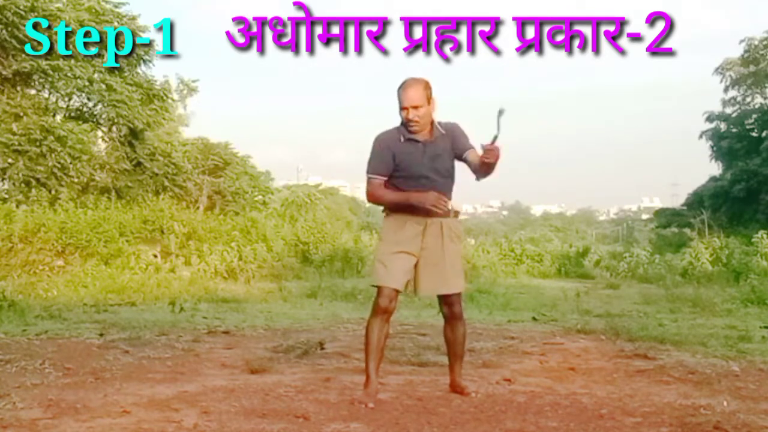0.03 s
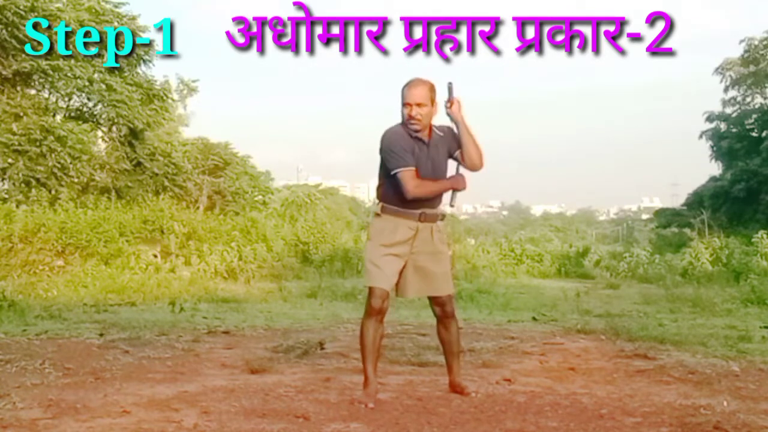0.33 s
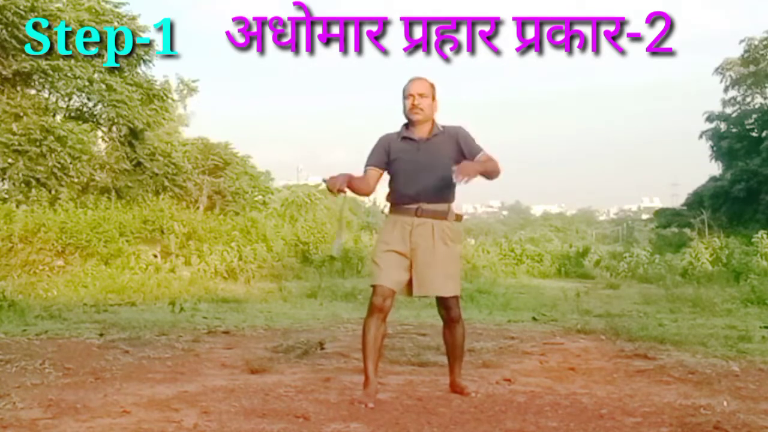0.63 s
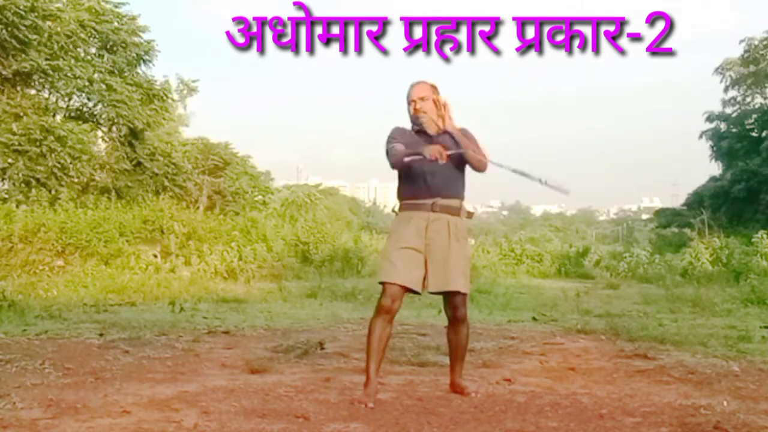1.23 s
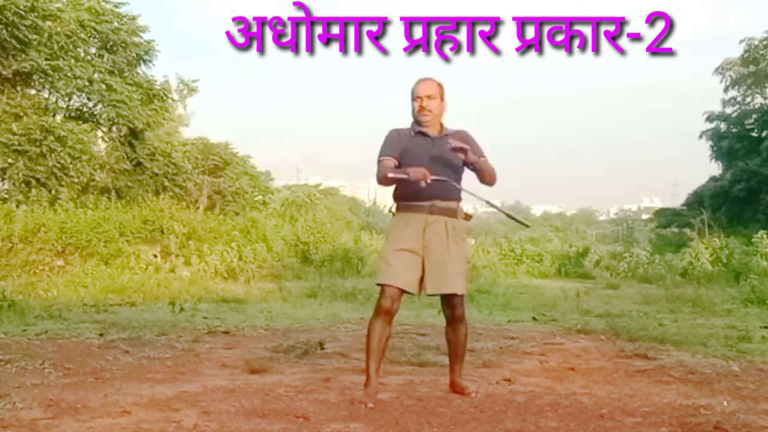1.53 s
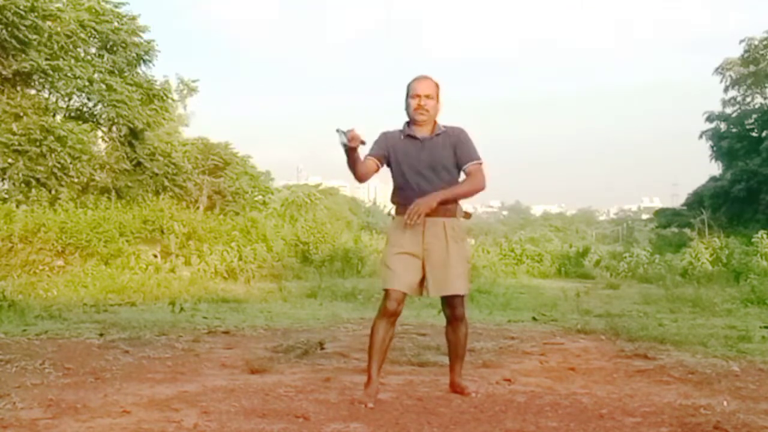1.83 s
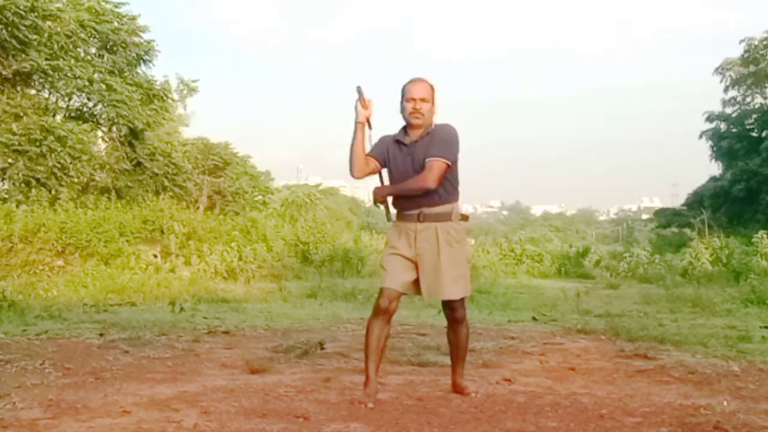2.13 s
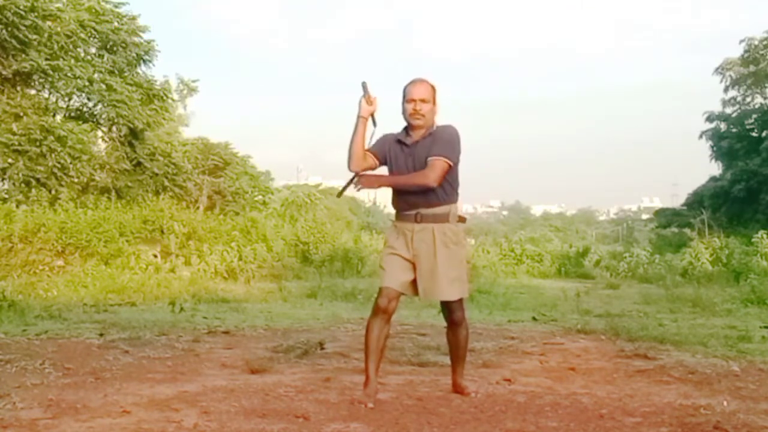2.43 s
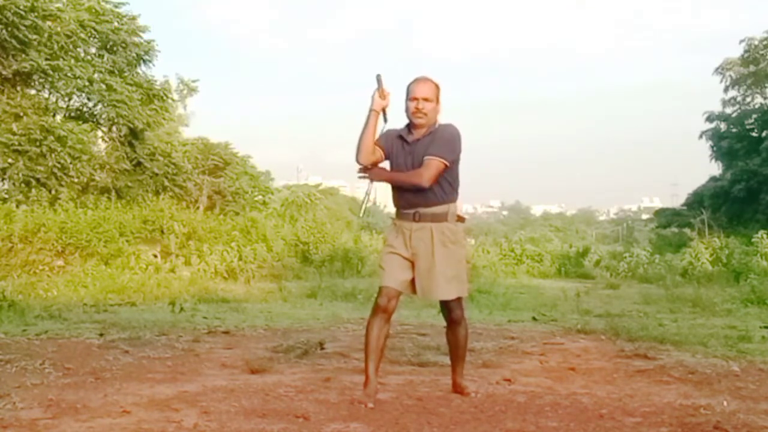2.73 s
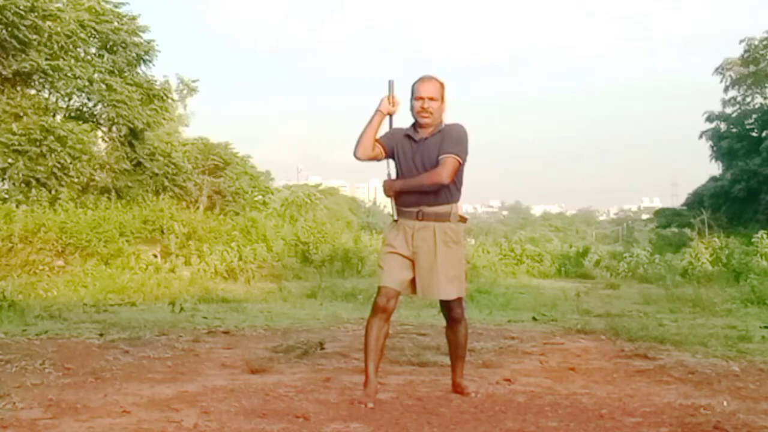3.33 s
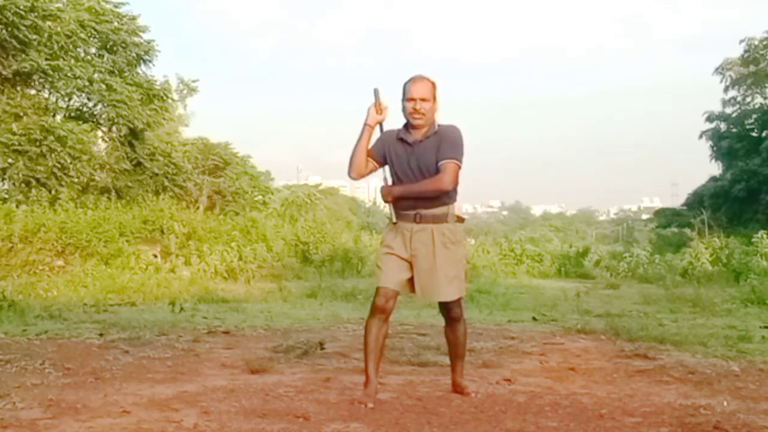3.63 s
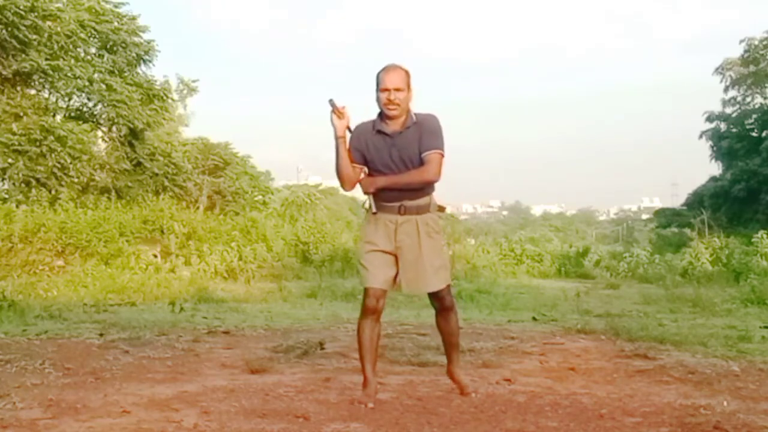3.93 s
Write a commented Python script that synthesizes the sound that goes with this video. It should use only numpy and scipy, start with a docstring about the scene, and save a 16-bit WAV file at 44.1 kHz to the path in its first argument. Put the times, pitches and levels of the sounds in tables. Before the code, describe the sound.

Metal nunchaku clinking and clacking as it is swung outdoors, with birds chirping.

```python
"""A metal nunchaku in a clearing

The chain clinks and slithers as its links collide, a stick swishes through the air, and the chain
snaps taut with a crack. Then the sticks clash and scrape, and one tube rings in its normal modes.
Around it are quick falling chirps, far bird whistles and calls, thin bands of insect sound and
a low outdoor rumble; trees and ground scatter back a short echo."""
import sys
import numpy as np
from scipy import signal
from scipy.fft import rfft, irfft, next_fast_len
from scipy.io import wavfile
from scipy.ndimage import map_coordinates

SR = 44100
rng = np.random.default_rng(int(sys.argv[2]) if len(sys.argv) > 2 else 0)


def waveform_to_disk(signal):
    """Save audio, clipped to [-1, 1], as 16-bit WAV at the path in sys.argv[1]."""
    frames = np.transpose(np.atleast_2d(signal))
    scaled = np.clip(frames, -1, 1) * 32767
    samples = np.round(scaled).astype(np.int16)
    wavfile.write(sys.argv[1], SR, samples)


N = 176400


def amp(db):
    """Amplitude ratio of a level in decibels."""
    return 10 ** (np.asarray(db) / 20)


def unit(x):
    """Normalisation to rms 1."""
    return x / np.sqrt(np.mean(x ** 2) + 1e-20)


def along(points, hz):
    """Interpolation of (frequency_hz, value) points on a logarithmic frequency axis."""
    f, v = np.transpose(points)
    return np.interp(np.log(hz + 1), np.log(f + 1), v)


def filtered(x, response):
    """Linear filtering: the spectrum of x times a frequency response."""
    m = next_fast_len(len(x) + 4096)
    return irfft(rfft(x, m) * response(np.fft.rfftfreq(m, 1 / SR)), m)[:len(x)]


def noise(spectrum, size=N):
    """Coloured noise of rms 1: white noise under a spectral envelope."""
    return unit(filtered(rng.standard_normal(size), lambda hz: amp(along(spectrum, hz))))


def wobble(rate, size=N):
    """Random modulation: a smooth curve with rate knots a second."""
    return map_coordinates(rng.standard_normal(8192), [np.arange(size) * rate / SR], mode="wrap")


def add(out, s, x):
    """Superposition: mix x into out from time s."""
    i = int(round(s * SR))
    x, i = x[max(-i, 0):], max(i, 0)
    out[i:i + len(x)] += x[:max(len(out) - i, 0)]


def decay(t60, rise, size=SR // 16):
    """Exponential damping after a quick rise: 60 dB down in t60 seconds."""
    t = np.arange(size) / SR
    return amp(-60 * t / t60) * (1 - np.exp(-t / rise))


def burst(spectrum, t60, rise):
    """Dense damped resonances merge into dying noise, with the energy of its envelope."""
    env = decay(t60, rise)
    return unit(env * noise(spectrum, size=len(env))) * np.sqrt(np.mean(env ** 2))


def mode(hz, t60, rise, size=SR // 16):
    """One mode of free vibration: a damped sinusoid."""
    return decay(t60, rise, size=size) * np.sin(2 * np.pi * hz * np.arange(size) / SR)


def gaussian(x, centre, width):
    """A Gaussian curve of height 1."""
    return np.exp(-.5 * ((x - centre) / width) ** 2)


def band(centre, width):
    """Narrow-band noise of rms 1."""
    return unit(filtered(rng.standard_normal(N), lambda hz: gaussian(hz, centre, width)))


def impulse(spectrum):
    """A minimum-phase click of peak 1: folding the cepstrum makes it causal."""
    size = 2048
    cepstrum = irfft(np.log(amp(along(spectrum, np.fft.rfftfreq(size, 1 / SR)))))
    cepstrum[1:size // 2] *= 2
    cepstrum[size // 2 + 1:] = 0
    click = irfft(np.exp(rfft(cepstrum)))
    return click / np.abs(click).max()


def puffs(rows, spectrum):
    """Moving air: noise under Gaussian swells, one to a row."""
    t = np.arange(N) / SR
    return noise(spectrum) * sum(amp(db) * gaussian(t, s, width) for s, width, db in rows)


def outdoor_air():
    """Ambient noise: slow modulation swells the rumble while the hiss above stays even."""
    # spectrum of the air: frequency_hz, gain_db
    spectrum = [(20, -31.5), (35, -18), (58, 0.5), (140, 1.5), (300, -4), (600, -14.5), (950, -15),
                (1280, -15.5), (1550, -16.5), (2300, -18.5), (3200, -19.5), (4300, -25), (5000, -12),
                (5800, -24), (6900, -23), (7700, -32.5), (14800, -34.5), (16000, -35.5)]
    air = amp(-62) * noise(spectrum)
    rumble = filtered(air, lambda hz: 1 / (1 + (hz / 900) ** 2))
    hiss = air - rumble
    return hiss + rumble * amp(-wobble(7.8))


def insect():
    """Amplitude modulation of a narrow noise band: a far insect buzzing in soft pulses."""
    # pulses of the buzz: centre_s, level_db
    pulses = [(.5, -66), (.7, -60), (.8, -59.5), (.96, -60), (1.11, -58), (1.35, -62), (1.51, -62),
              (1.66, -58.5), (1.79, -52), (1.93, -61), (2.06, -63.5), (2.329, -67), (2.5, -64.5),
              (2.68, -68), (2.818, -57), (3.07, -69), (3.2, -72), (3.33, -62), (3.49, -59.5),
              (3.621, -67.5), (3.761, -63), (3.92, -60)]
    t = np.arange(N) / SR
    return band(centre=5008, width=140) * sum(amp(db) * gaussian(t, s, width=0.03) for s, db in pulses)


def chorus():
    """Superposition: many far birds and insects merge into narrow, swelling bands."""
    # bands of the chorus: centre_hz, width_hz, level_db
    bands = [(1270, 40, -74), (1796, 72, -78.5), (6670, 90, -73.5)]
    swell_db = 4
    return sum(amp(db + swell_db * np.tanh(wobble(13))) * band(hz, width) for hz, width, db in bands)


def echo(x):
    """Diffuse scattering by trees and ground: convolution with a decaying noise tail."""
    # reverberation time of the clearing: frequency_hz, t60_s
    decay_times = [(200, 0.067), (3000, 0.26), (7000, 0.089), (11000, 0.2), (15000, 0.06)]
    hz, t, spectra = signal.stft(rng.standard_normal(SR // 2), SR, nperseg=256)
    damping = amp(-60 * t / along(decay_times, hz)[:, None])
    tail = signal.istft(spectra * damping, SR, nperseg=256)[1]
    return signal.fftconvolve(x, tail / np.linalg.norm(tail))[:N]


def glides(rows, width_hz, clear):
    """Gliding tones: random modulation spreads sidebands around a carrier of amplitude clear."""
    out = np.zeros(N)
    for s, length, first_hz, last_hz, db in rows:
        n = int(length * SR)
        progress = np.arange(n) / n
        hz = first_hz + (last_hz - first_hz) * progress
        blur = clear + wobble(2 * width_hz, n) + 1j * wobble(2 * width_hz, n)
        tone = np.real(blur * np.exp(2j * np.pi * np.cumsum(hz) / SR))
        add(out, s, amp(db) * unit(tone) * np.sqrt(np.sin(np.pi * progress)))
    return out


def far_whistles():
    """Far birds whistle: narrow sidebands leave the pitch distinct."""
    # whistled notes: start_s, length_s, first_hz, last_hz, level_db
    notes = [(.38, 0.175, 1450, 1431, -64), (.67, 0.142, 1585, 1534, -69), (.72, 0.12, 2286, 2170, -67),
             (.93, 0.186, 1550, 1489, -66), (.94, 0.054, 2800, 2330, -63.5), (1.03, 0.074, 2065, 2320, -60),
             (1.33, 0.091, 1943, 1882, -58), (1.48, 0.27, 1695, 1617, -62.5),
             (1.582, 0.024, 1080, 1317, -50), (1.82, 0.12, 1823, 1715, -60), (2.45, 0.097, 1827, 1780, -63),
             (2.69, 0.18, 1953, 1787, -58), (3.06, 0.14, 1983, 1835, -62.5),
             (3.31, 0.075, 1870, 1760, -60.5), (3.55, 0.17, 1608, 1740, -67),
             (3.82, 0.1, 1650, 1513, -63.5)]
    return glides(notes, width_hz=72, clear=1.0)


def far_calls():
    """Far birds call: wide sidebands over a weak carrier sound hoarse."""
    # hoarse notes: start_s, length_s, first_hz, last_hz, level_db
    notes = [(.61, 0.034, 3840, 3500, -55.5), (.62, 0.023, 2365, 2060, -59),
             (3.08, 0.034, 3470, 3170, -67.5), (3.2, 0.083, 2976, 4320, -61),
             (3.62, 0.048, 2100, 2312, -64.5), (3.745, 0.047, 3100, 2600, -59),
             (3.8, 0.05, 2610, 2217, -56), (3.855, 0.056, 3134, 2796, -51.5),
             (3.93, 0.042, 2850, 2500, -62.5)]
    return glides(notes, width_hz=400, clear=0.26)


def chirps():
    """Linear downward frequency sweeps in short runs, with fainter ones from further off."""
    # near chirps: peak_s, relative_level_db
    runs = [(.065, -48), (0.163, -34), (.194, -31.5), (0.229, -31), (.351, -43), (.458, -45.5),
            (.49, -46.5), (0.525, -45.5), (0.578, -42), (0.611, -43.5), (0.732, -41), (0.765, -34),
            (0.8, -31.5), (.832, -49.5), (.917, -48), (1.117, -47.5), (1.154, -42.5), (1.186, -45.5),
            (1.406, -45.5), (1.423, -36), (1.455, -32), (1.489, -31.5), (1.611, -49), (1.736, -44.5),
            (1.91, -50), (1.934, -46), (1.97, -44.5), (2.009, -43.5), (2.134, -36), (2.166, -33),
            (2.201, -31), (2.326, -50), (2.686, -47), (2.711, -39), (2.742, -33), (2.774, -31.5),
            (2.81, -44), (2.829, -41.5), (2.864, -46.5), (3.298, -40), (3.329, -34), (3.363, -34),
            (3.435, -49.5), (3.481, -45.5), (3.503, -47.5), (3.858, -40.5), (3.889, -33.5), (3.922, -33)]
    pitch_hz, fall_hz_per_s, flutter_db, far_per_s = 6628, 33700, 4, 36
    rise_s, fall_s = 0.0061, 0.0033
    out, t = np.zeros(N), np.arange(-SR // 40, SR // 40) / SR
    env = np.exp(-(t / np.where(t < 0, rise_s, fall_s)) ** 2)
    env += amp(-11) * np.exp(-((t - 0.008) / 0.0053) ** 2)  # the sweep's weak low end
    near = [(s, db, pitch_hz) for s, db in runs]
    far = [((k + delay) / far_per_s, -60 + 8 * (strength - .5), pitch_hz - 350 * drop)
           for k, (delay, strength, drop) in enumerate(rng.random((int(far_per_s * N / SR), 3)))]
    for s, db, hz in near + far:
        phase = 2 * np.pi * (hz * t - fall_hz_per_s * t * t / 2) + 0.22 * wobble(500, len(t))
        flutter = amp(flutter_db * wobble(353, len(t)))
        tone = flutter * (np.sin(phase) + amp(-39.5) * np.sin(2 * phase))
        add(out, s + t[0], amp(db + 1.5) * unit(env * tone) * np.sqrt(np.mean(env ** 2)))
    return out


def thuds():
    """Arms and cloth displace air in soft, low-frequency swells."""
    # movements: centre_s, width_s, level_db
    movements = [(.02, 0.04, -65), (.17, 0.14, -60), (1.212, 0.014, -47), (1.755, 0.04, -57.5),
                 (2.8, 0.058, -58), (3.76, .03, -55.5)]
    # spectrum of a thud: frequency_hz, gain_db
    spectrum = [(30, -27), (80, 2), (170, 0.5), (280, -9.5), (600, -16), (2000, -42.5)]
    return puffs(movements, spectrum)


def swishes():
    """Flow noise around a stick, with a blurred whistle that climbs as the stick speeds up."""
    # swings: centre_s, width_s, level_db, mid_pitch_hz
    swings = [(0.19, 0.13, -59.5, 340), (1.255, 0.045, -47.5, 880), (1.89, 0.045, -59, 390)]
    # spectrum of the rushing air: frequency_hz, gain_db
    spectrum = [(35, -33.5), (90, -13), (200, -1), (450, -18.5), (1000, -3.5), (2000, -6.5), (5000, -7.5),
                (12000, -41)]
    climb, whistle_db = .28, -3.5
    out = puffs([row[:3] for row in swings], spectrum)
    t = np.arange(-SR // 3, SR // 3) / SR
    for s, width, db, mid_hz in swings:
        hz = mid_hz * (1 + climb * np.tanh(t / width))
        whistle = unit(wobble(200, len(t)) * np.sin(2 * np.pi * np.cumsum(hz) / SR))
        add(out, s + t[0], amp(db + whistle_db) * whistle * gaussian(t, 0, width))
    return out


def slither():
    """Shot noise: dense tiny pings as the chain runs over itself and the stick."""
    # runs of the chain: start_s, length_s, level_db
    runs = [(0.0, .10, -51.5), (0.138, 0.14, -48), (0.289, 0.061, -39.5), (0.365, .12, -55),
            (0.904, 0.054, -55), (1.208, 0.069, -45.5), (1.62, 0.13, -55.5), (1.755, .13, -54.5),
            (1.907, 0.098, -63)]
    # filter that colours the pings: frequency_hz, gain_db
    colour = [(200, -2), (700, -1.5), (1250, -14.5), (1600, 2.5), (3300, 9), (5200, 5.5), (7000, -6),
              (8200, -34), (9600, -17.5), (13000, -25), (15000, -7.5), (16000, -25.5)]
    pings_per_s, low_hz, high_hz, edge_s = 2600, 849, 15270, 0.013
    t, age = np.arange(N) / SR, np.arange(300)
    when, pitch, strength = rng.random((int(pings_per_s * N / SR), 3)).T[:, :, None]
    hz = low_hz + (high_hz - low_hz) * pitch ** 2
    gain = amp(-3 * np.log(strength + 0.054)) * np.sqrt(hz)  # many weak pings, a few strong
    pings = gain * mode(hz, t60=0.013, rise=0.00022, size=len(age))
    positions = (when * N).astype(int) + age
    grains = np.bincount(positions.ravel(), pings.ravel(), N)[:N]
    env = sum(amp(db) * np.clip(np.minimum(t - s, s + length - t) / edge_s + .5, 0, 1)
              for s, length, db in runs)
    return unit(filtered(grains, lambda hz: amp(along(colour, hz)))) * env


def clinks():
    """Impacts excite the links' modes: a clack with a short note, a pinging tick and some body."""
    # knocks, with levels ahead of each part's trim: start_s, clack_db, pitch_hz, tick_db, body_db
    knocks = [(0.0004, -14, 5060, -27.5, -31.5), (0.0098, -19.5, 3190, -39, -27.5),
              (0.0192, -27, 3960, -59, -39.5), (0.0436, -20.5, 4130, -38.5, -30.5),
              (0.1136, -29.5, 3700, -45, -61), (0.1395, -22.5, 2700, -39, -56),
              (0.1519, -33, 5160, -39, -33.5), (0.1772, -27, 3380, -49, -43),
              (0.1856, -19, 3960, -33.5, -59), (0.1934, -20, 3460, -48, -63), (0.2092, -42, 3460, -49, -57),
              (0.234, -20, 3700, -52, -60), (0.2377, -19, 3590, -57, -46), (0.2428, -28, 3780, -60, -55),
              (0.251, -22, 3490, -68, -45), (0.277, -27, 5030, -45, -39), (0.287, -26.5, 3510, -55, -35),
              (0.2992, -23, 3600, -55, -45.5), (0.3078, -17, 2720, -30, -29),
              (0.3113, -21.5, 3100, -32, -37), (0.3227, -20.5, 5620, -48, -39),
              (0.326, -17.5, 5020, -44, -38), (0.3297, -40, 3440, -51, -47), (0.337, -33, 3560, -36, -57),
              (0.3513, -25, 5400, -46, -40.5), (0.404, -35.5, 5080, -50, -65),
              (0.4353, -39, 2900, -35, -49.5), (0.5517, -31.5, 3820, -71, -59),
              (0.6809, -35.5, 4850, -64, -69), (0.708, -36, 4670, -58, -66),
              (0.813, -28.5, 3430, -46, -46.5), (0.904, -31.5, 2840, -55, -56),
              (0.9165, -39, 2980, -55, -47), (1.079, -37, 3050, -46.5, -70), (1.2124, -31, 4270, -66, -50),
              (1.2276, -23, 3720, -39.5, -46.5), (1.238, -33, 4770, -58, -45),
              (1.2584, -31, 2960, -60, -35), (1.27, -36, 3900, -62, -41.5), (1.2922, -22, 3380, -46, -36.5),
              (1.3095, -31, 3140, -88, -43), (1.373, -39.5, 5030, -53, -66),
              (1.418, -33.5, 5550, -53, -47.5), (1.4249, -35, 3170, -49, -37),
              (1.562, -36, 3420, -49.5, -61), (1.6725, -34, 3310, -41, -45),
              (1.8064, -27.5, 3210, -43, -56), (1.8271, -18, 4120, -35.5, -34.5),
              (1.8403, -19.5, 3930, -39, -33.5), (1.8735, -32, 2920, -57, -53),
              (1.9241, -27, 3030, -57, -47), (1.971, -38, 3690, -68, -63.5), (1.998, -34, 3800, -63, -64.5),
              (2.008, -38.5, 2780, -66, -66), (2.216, -30, 5220, -55, -39), (2.234, -40, 4800, -55, -49),
              (2.453, -52, 3300, -58.5, -60.5), (2.7551, -32, 5250, -42.5, -50),
              (2.795, -40.5, 2560, -51, -51), (2.9481, -35, 3100, -41.5, -47.5),
              (3.023, -42.5, 3170, -43, -82.5), (3.9029, -29, 2690, -50, -43)]
    # spectrum of the mid-range clack: frequency_hz, gain_db
    clack_spectrum = [(900, -27.5), (1700, -10.5), (2800, -1.5), (4100, 0.5), (5200, -6.5), (6500, -3.5),
                      (8000, -27.5), (16000, -28)]
    # spectrum of the treble tick: frequency_hz, gain_db
    tick_spectrum = [(5000, -20.5), (8000, -10), (9400, 16.5), (10400, -23.5), (11400, 12), (13200, -3),
                     (15000, 17.5), (16000, -27)]
    # spectrum of the low body: frequency_hz, gain_db
    body_spectrum = [(40, -15), (130, -3), (400, -10), (750, -7), (1050, 5), (1250, 12.5), (1500, -5),
                     (2000, 10.5), (3500, -14.5)]
    out, rise = np.zeros(N), 0.0013
    for s, clack_db, hz, tick_db, body_db in knocks:
        note = mode(hz, t60=0.013, rise=rise)
        clack = burst(clack_spectrum, t60=0.018, rise=rise) + amp(8.5) * note
        ping = mode(hz=10430 + 990 * rng.standard_normal(), t60=0.022, rise=rise)
        tick = burst(tick_spectrum, t60=0.0098, rise=rise) + amp(-5) * ping
        body = burst(body_spectrum, t60=0.038, rise=rise)
        add(out, s, amp(clack_db - 5) * clack + amp(tick_db + 2.5) * tick + amp(body_db - 1.5) * body)
    return out


def scrape():
    """Sliding friction: gritty metallic noise that fades as the stick comes to rest."""
    # spectrum of the scrape: frequency_hz, gain_db
    spectrum = [(200, -9), (800, -15), (1250, -12), (1450, -15), (1800, -12.5), (3000, 3.5), (5200, 3),
                (6800, 1.5), (7700, -12), (8300, -21.5), (9700, -3.5), (13000, -19), (14800, -8),
                (16000, -31.5)]
    start_s, end_s, release_s, grit_db = 2.122, 2.217, .021, 2.8
    t = np.arange(N) / SR
    env = (t > start_s) * np.exp(-np.maximum(t - end_s, 0) / release_s)
    grit = amp(grit_db * wobble(520))
    return amp(-44.5) * env * unit(grit * noise(spectrum))


def tube_ring():
    """A struck tube rings in inharmonic modes; close pairs beat and random modulation roughens them."""
    # modes of the tube: pitch_hz, gain_db, t60_s
    modes = [(1277, -36.5, 0.49), (1004, -23, 0.0506), (1362, -38, 0.06), (1794, -41.5, 0.63),
             (3178, -0.5, 0.059), (3163, -15.5, 0.36), (3093, -20.5, 0.4), (3330, -25, 0.25),
             (4600, -37.5, 0.37), (5330, -23, 0.123), (7380, -35, .35), (9700, -39, .2)]
    # knocks that excite it: start_s, level_db
    knocks = [(0.044, -36.5), (0.435, -45), (1.925, -42), (2.1152, -13), (2.757, -46.5), (2.947, -41.5),
              (3.022, -47)]
    out, t = np.zeros(N), np.arange(SR // 2) / SR
    roughness = .55 * np.minimum(t / 0.022, 1)
    for s, knock_db in knocks:
        for hz, db, t60 in modes:
            waver = wobble(120, len(t)) + 1j * wobble(120, len(t))
            tone = np.imag((1 + roughness * waver) * np.exp(2j * np.pi * hz * t))
            add(out, s, amp(knock_db + db) * decay(t60, rise=0.0016, size=len(t)) * tone)
    return out


def clash():
    """Collision and rebound of the sticks: each contact excites a broad band of resonances."""
    # contacts: start_s, level_db, t60_s
    contacts = [(2.1149, -13, 0.032), (2.1229, -13.5, 0.0087), (2.133, -41, .03)]
    # spectrum of a contact: frequency_hz, gain_db
    spectrum = [(100, -22.5), (700, -41.5), (1250, 2), (1800, -12.5), (3200, 5.5), (4200, 2.5), (5500, 1.5),
                (6600, 6.5), (8000, -21.5), (9500, -8.5), (13000, -13), (15000, -7.5), (16000, -36.5)]
    out = np.zeros(N)
    for s, db, t60 in contacts:
        add(out, s, amp(db) * burst(spectrum, t60, rise=0.0008))
    return out


def snap():
    """Impulsive loading: the chain pulls taut with sharp cracks and briefly ringing resonances."""
    # cracks: start_s, peak_db
    cracks = [(1.7484, -4), (1.748, -15.5)]
    # ringing of the jolted chain: start_s, level_db, t60_s
    jolts = [(1.7446, -31, 0.032), (1.748, -13.5, 0.014)]
    # spectrum of both: frequency_hz, gain_db
    spectrum = [(40, -52), (130, -15), (700, -21.5), (1250, -1), (1700, -20), (3150, -2.5), (3700, -6),
                (5000, 1.5), (7100, -1), (7900, -21), (9500, -7.5), (11000, -18.5), (12600, -0.5),
                (14000, -20), (14850, 7), (16000, -13), (17000, -47.5)]
    out = np.zeros(N)
    for s, db in cracks:
        add(out, s, amp(db) * impulse(spectrum))
    for s, db, t60 in jolts:
        add(out, s, amp(db) * burst(spectrum, t60, rise=.00008))
    return out


def scene():
    """Direct and scattered sound add; the far birds have the largest share of echo."""
    swinging = clinks() + clash() + tube_ring() + scrape() + slither() + swishes() + thuds()
    crack, chirping = snap(), chirps()
    whistles, calls = far_whistles(), far_calls()
    direct = swinging + crack + chirping + whistles + calls
    scattered = echo(amp(-15) * swinging + amp(-20) * crack + amp(-13) * chirping
                     + amp(-6) * whistles + amp(-4.5) * calls)
    return (direct + scattered + outdoor_air() + insect() + chorus())[None]


def record(dry):
    """Band limiting: an ideal low-pass filter removes the highest treble."""
    return filtered(dry[0], lambda hz: hz < 16300)[None]


dry = scene()
out = record(dry)
waveform_to_disk(out)
```